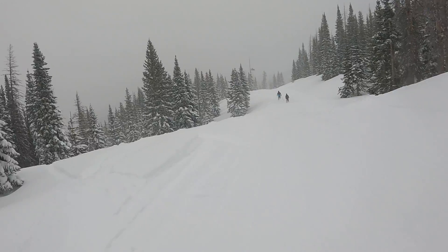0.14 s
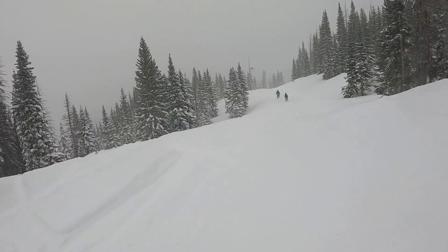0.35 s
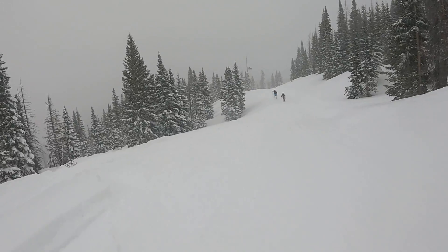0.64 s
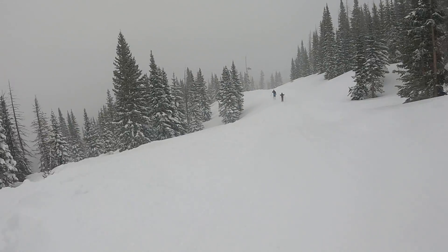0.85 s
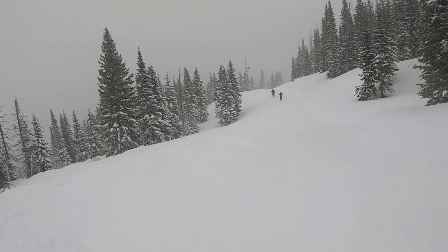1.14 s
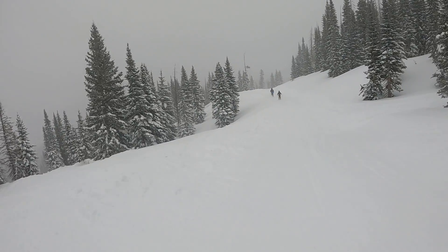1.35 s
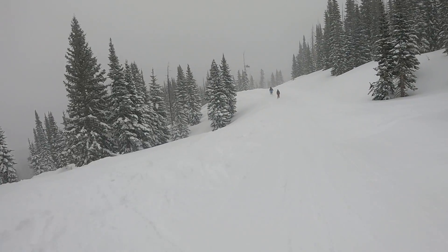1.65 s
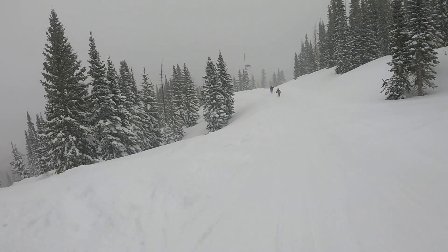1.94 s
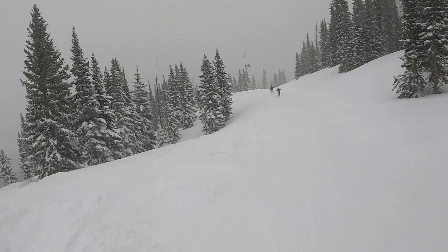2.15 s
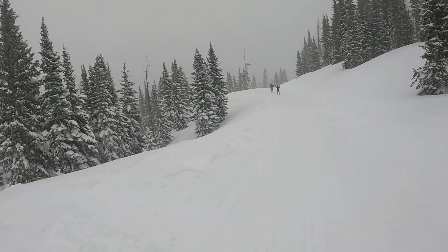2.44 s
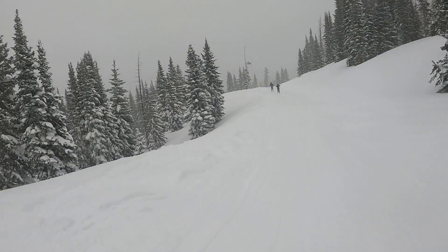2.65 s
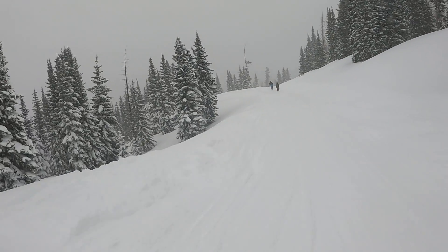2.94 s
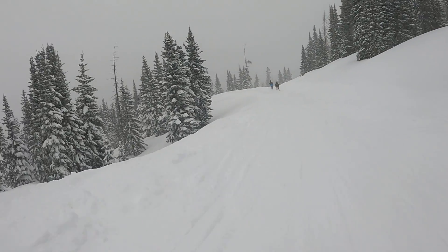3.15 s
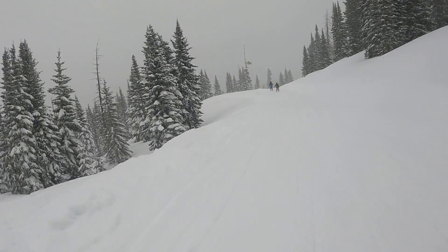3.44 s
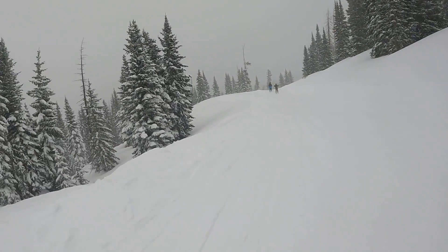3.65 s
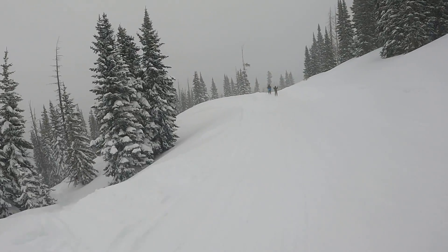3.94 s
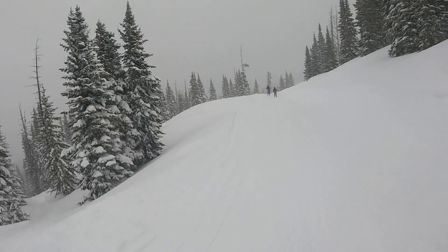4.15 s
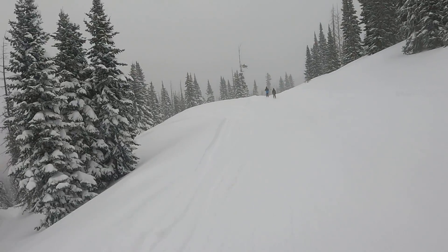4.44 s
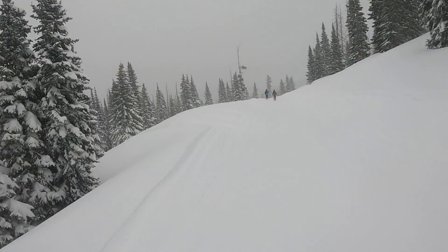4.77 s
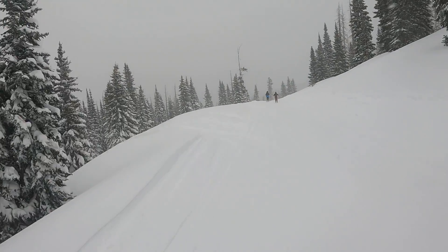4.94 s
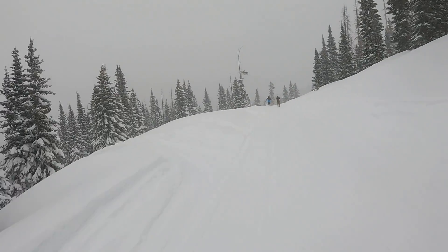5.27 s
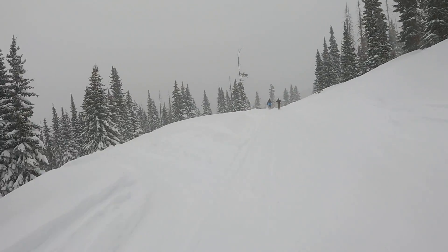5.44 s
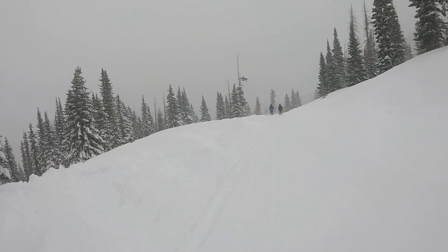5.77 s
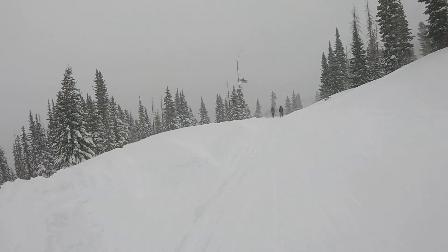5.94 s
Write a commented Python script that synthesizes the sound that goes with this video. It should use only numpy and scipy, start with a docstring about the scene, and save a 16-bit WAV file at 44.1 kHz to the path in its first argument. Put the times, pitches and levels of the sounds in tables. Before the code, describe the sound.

Skiing through falling snow: crisp, irregular little ticks close on the microphone, with thin ski hiss and deep wind buffeting.

```python
"""Skiing in falling snow

A small camera rides with a skier down a slope. Ice grains tick against its plastic housing, which rings
for a millisecond or two; the skis hiss through the same housing; wind rumbles on the microphones and
shakes the mount. The camera thins out everything between the rumble and about 800 Hz."""
import sys
import numpy as np
from scipy import signal
from scipy.fft import rfft, irfft, next_fast_len
from scipy.io import wavfile
from scipy.ndimage import uniform_filter1d

SR = 44100
rng = np.random.default_rng(int(sys.argv[2]) if len(sys.argv) > 2 else 0)


def master_out(mix):
    """Clip the mix to full scale and print it as 16-bit PCM to the path in sys.argv[1]."""
    frames = np.transpose(np.atleast_2d(mix))
    ceiling = np.clip(frames, -1, 1)
    pcm = np.round(ceiling * 32767).astype(np.int16)
    wavfile.write(sys.argv[1], SR, pcm)


N = 269451
TIME_S = np.arange(N) / SR
TAIL_S = np.arange(600) / SR

# Housing modes: pitch_hz, ring_ms, struck_db, hiss_db, left_over_right_db, left_lead_rad
HOUSING_MODES = [(818, 2.05, -19, -20, -12, 1.), (1006, 0.87, -4.5, -15, -3, 0.12),
                 (1330, 0.72, 8.5, -11.5, 2, 0.17), (1726, 0.42, 11.5, -9, 2.5, 0.35),
                 (2250, 0.54, -9, -12, 3, -0.99), (2881, 0.51, 0.5, -10.5, 4.5, -0.86),
                 (3366, 0.37, -2.5, -16.5, 1.5, -1.44), (4260, 0.33, 1, -9.5, -6.5, 0.06),
                 (4656, 0.27, 3, -11, -2, 0.24), (5405, 0.25, 5, -10.5, -2.5, 0.044),
                 (6170, 0.22, -1, -19, 0.5, 0.05), (7100, 0.16, -0.5, -21, 1, -0.093),
                 (8190, 0.15, -14, -24, 3, 0.31), (9430, 0.15, -13.5, -35.5, 1, 0.63),
                 (11600, 0.1, -26, -33, 2.5, 0.91), (13800, 0.19, -39, -58, -2, -1.4),
                 (15600, 0.25, -50, -61, -6, .8)]
KNOCK_MODES, RING_MODES, FIZZ_MODES = HOUSING_MODES[:6], HOUSING_MODES[6:11], HOUSING_MODES[11:]
# Skis on snow: time_s, crackle_db, swish_db, bite_re_swish_db
GLIDE = [(0.0, -49, -51, -1), (0.53, -46.5, -48.5, 5.5), (0.95, -49, -49.5, 2.5), (1.3, -54.5, -55, 3.5),
         (1.48, -51, -58, -0.5), (1.8, -48, -52, -2), (2.04, -48, -54.5, 1.5), (2.28, -45.5, -49.5, 7.5),
         (2.48, -45.5, -50, 9.5), (2.7, -46, -52.5, 8.5), (3.44, -46, -47, 0.5), (3.6, -43.5, -47, 4.5),
         (3.95, -47, -43, -5.5), (4.27, -42.5, -47.5, 6.5), (4.47, -47.5, -50, 3), (5.25, -47, -49.5, -3),
         (5.73, -44, -48, -2), (6.11, -45, -47, -4)]
# Wind strength: time_s, buffet_db, rush_db
WIND_LEVELS = [(0.0, -40, -77), (0.12, -41, -72), (0.41, -47, -69), (0.66, -41, -68), (1.53, -43.5, -76),
               (1.94, -40, -66.5), (2.11, -31.5, -75), (2.21, -42.5, -66.5), (2.31, -34, -70),
               (2.45, -39, -65), (3.11, -34.5, -70), (3.84, -40.5, -61.5), (4.53, -31, -69.5),
               (4.83, -42, -66), (5.31, -38, -70), (5.34, -45, -71.5), (5.87, -40, -64.5),
               (6.11, -46.5, -71.5)]
# Wind spectrum on the microphones: frequency_hz, density_db
WIND_SPECTRUM = [(3.5, -16), (6.0, 5.5), (21, 1), (64, -13.5), (101, -20), (114, -18.5), (162, -24),
                 (383, -35.5), (665, -33.5), (800, -34.5), (1040, -65), (1760, -120)]
# Stronger fits of mount shake: start_s, length_s, level_db
SHAKE_FITS = [(0.752, 0.17, -53.5), (1.329, 0.051, -46.5), (2.4, .06, -50), (2.54, 0.037, -47),
              (2.75, 0.054, -44), (3.055, .072, -54), (3.235, 0.07, -46), (3.37, .12, -41.5),
              (3.615, 0.093, -37), (3.962, 0.21, -40.5), (4.335, 0.1, -50), (4.974, 0.073, -44.5),
              (5.612, 0.056, -48.5), (5.717, 0.045, -45), (5.816, 0.057, -50)]
# Distinct ice grains: start_s, ring_peak_db, ring_hz, knock_re_ring_db, knock_hz, fizz_re_ring_db
ICE_TICKS = [(0.0206, -20.5, 4950, -20, 2910, -15), (0.1678, -16, 4730, -35, 1390, -27),
             (0.1847, -24, 4510, -22, 3090, -2), (0.2143, -19, 4450, -27, 1730, -18),
             (0.2279, -8, 5470, -10.5, 3220, -12), (0.4112, -22, 4300, -17, 2870, -5),
             (0.5664, -16.5, 4800, -18, 1550, -19), (0.705, -34, 5150, -0.5, 840, -22),
             (0.8039, -7.5, 4760, -22.5, 1570, -20), (0.8832, -25.5, 4660, -4.5, 1220, -14),
             (0.8961, -16, 4750, -21, 1650, -13), (0.9219, -35.5, 4890, 5, 1270, -21),
             (0.9748, -9, 5280, -13.5, 3200, -17), (0.9873, -22, 4560, -29, 1480, -16),
             (1.0024, -10.5, 5200, -12.5, 3260, -16), (1.0906, -18.5, 4330, -14, 2980, -10),
             (1.154, -30.5, 4330, -5, 977, -28), (1.228, -40.5, 5150, 9.5, 2860, -1),
             (1.237, -20.5, 4840, -7, 2800, -14), (1.2996, -20, 4630, -17, 3010, -5),
             (1.3138, -18, 4670, -18, 2970, -13), (1.3231, -21.5, 5120, -6, 2800, -27),
             (1.377, -20.5, 4900, -15, 3000, -9), (1.572, -24, 5470, -17, 1610, -5.5),
             (1.6218, -24, 4060, -8, 1330, -9), (1.6512, -18.5, 4500, -15, 3040, -6),
             (1.6997, -19, 4270, -10, 2960, -10), (1.7111, -20, 4230, -7.5, 1310, -8),
             (1.7413, -20.5, 4720, -9, 2860, -7), (1.764, -26, 4570, -8.5, 1610, 0.5),
             (1.8175, -21, 4300, -20, 2800, -8), (1.9068, -10, 4640, -24.5, 1430, -20),
             (1.9473, -15, 4600, -22, 2960, -12), (1.9945, -19, 4670, -23, 1530, -28),
             (2.032, -21, 4700, -32, 2940, -16), (2.0686, -19, 3900, -0.5, 1900, -8),
             (2.1931, -28, 5100, 3.5, 3140, -19), (2.2293, -23.5, 4000, 2, 1220, -5),
             (2.3138, -20, 5150, -23, 2970, -16), (2.4149, -14.5, 5300, -10, 2950, -12),
             (2.4454, -22.5, 5200, -13, 2890, -11), (2.5249, -10, 3680, -4.5, 1480, -16.5),
             (2.552, -22, 4230, -25, 2980, -6), (2.5916, -15, 4280, -15, 1710, -7),
             (2.6285, -17.5, 4670, 1.5, 3140, -2.5), (2.6877, -13.5, 4600, -16.5, 1480, -15),
             (2.745, -21, 5150, -28, 2900, -20), (2.8199, -24, 4170, -10, 2990, -2),
             (2.835, -23.5, 4110, -6, 1600, -6), (2.9026, -15, 4200, -6.5, 2900, -11),
             (2.914, -12, 5070, -22, 1510, -17), (2.9307, -18.5, 4200, -5.5, 857, -18),
             (2.9349, -30.5, 5150, -4, 810, -11), (2.9876, -18, 4700, -24, 1910, -21),
             (3.0822, -25.5, 4020, 2, 2850, -8), (3.111, -20, 4980, 0, 2580, -3),
             (3.1144, -15, 4360, -7.5, 2800, -17), (3.1679, -22, 4650, -29, 1400, -17),
             (3.172, -12, 4830, -28, 1540, -20), (3.19, -22, 5240, -19, 2420, -9),
             (3.203, -22.5, 4260, -24, 1650, -19), (3.2396, -22, 4190, -6, 1740, -19),
             (3.2453, -11.5, 4740, -14, 2050, -15), (3.2549, -18, 5860, -10, 2860, -23),
             (3.3066, -11, 4650, -16, 3100, -6.5), (3.3613, -5.5, 4430, -24.5, 2920, -17),
             (3.446, -21.5, 4150, -2, 1270, -10), (3.5545, -18, 4910, -2.5, 2800, -9),
             (3.5706, -9.5, 5190, -17, 1740, -19), (3.6321, -19.5, 4300, -0.5, 1760, -34),
             (3.6481, -17, 5200, -14.5, 2910, -11), (3.695, -13, 5330, -18, 1630, -9),
             (3.7222, -18.5, 4200, -10.5, 3000, -7), (3.746, -21, 5400, -6, 2800, -27),
             (4.0186, -31, 4070, 1.5, 1400, -20), (4.0521, -20, 4120, -4, 1840, -27),
             (4.0963, -13, 4630, -11.5, 3000, -15), (4.1547, -21, 5200, -24, 3010, -17),
             (4.1864, -25, 4230, 4, 873, -25), (4.2005, -29, 4160, -1, 1370, -6),
             (4.2069, -10.5, 4300, -8.5, 1710, -17), (4.2198, -18, 4800, -3, 1740, -15),
             (4.2251, -10, 4670, -17, 2780, -19), (4.332, -38, 3960, 2, 975, -19),
             (4.3727, -13.5, 4730, -26, 2910, -21), (4.4242, -15, 4700, -20, 3090, -14),
             (4.4421, -11, 4650, -25.5, 1600, -21), (4.4966, -14.5, 4800, -13, 2930, -9.5),
             (4.5688, -26, 4740, -4.5, 1680, -13), (4.599, -9.5, 5170, -12, 1280, -7),
             (4.6337, -28.5, 5740, 0, 940, -21), (4.7656, -15, 5300, -17, 1640, -13),
             (4.7923, -7.5, 4130, -10, 1410, -12.5), (4.8, -18, 4570, -21, 1580, -17),
             (4.805, -21, 4750, -21, 1940, -24), (4.8626, -18.5, 4640, -10, 1520, -10.5),
             (4.9051, -11.5, 4650, -18, 1550, -16), (4.914, -21.5, 4170, -9, 1500, -6),
             (4.9268, -19, 4270, -13.5, 1270, -7), (4.9482, -21.5, 4290, -4, 1360, -8),
             (4.985, -20, 4760, -17, 2970, -19), (5.0458, -18, 4620, -30, 3060, -10),
             (5.0669, -13, 4800, -13.5, 1350, -8), (5.095, -6.5, 5230, -18, 3020, -10.5),
             (5.1536, -17, 5130, -20, 1510, -12.5), (5.1612, -13.5, 5100, -20, 1710, -14),
             (5.2151, -13.5, 4470, -15, 3070, -15), (5.3463, -22.5, 4160, -3, 1360, -7),
             (5.3655, -20, 5530, -14, 2970, -11), (5.4575, -17.5, 4800, -13, 2860, -12),
             (5.519, -10, 5400, -18.5, 3040, -10), (5.568, -17, 4040, -9.5, 1730, -15),
             (5.5868, -14.5, 5170, -17.5, 1830, -13), (5.6327, -15.5, 4540, -27, 1820, -19),
             (5.6619, -28.5, 4750, -0.5, 1720, -15), (5.6724, -9, 4350, -19.5, 1380, -16),
             (5.6818, -16, 4600, -22, 3040, -6), (5.7184, -16, 5140, -15, 1570, -14),
             (5.7453, -15, 4600, -9.5, 2860, -21), (5.755, -13, 4400, -13.5, 1510, -9),
             (5.824, -24, 5170, -8.5, 1660, -11), (5.8587, -12, 5300, -15, 3120, -18),
             (5.894, -19.5, 5400, -20, 1670, -6), (5.9214, -20.5, 4400, -7, 1730, -16),
             (5.973, -23, 4570, -4.5, 1670, -6), (6.0668, -21.5, 4340, -9, 1300, -15),
             (6.0749, -20, 4300, 2, 1560, -13)]
# Blunt thumps on the microphones: start_s, peak_db
THUMPS = [(4.788, -46), (5.01, -32), (5.221, -42)]


def undb(db):
    """Decibels to gain."""
    return 10 ** (np.asarray(db) / 20)


def unit(x):
    """Scale to rms 1."""
    return x / np.sqrt(np.mean(x ** 2))


def curves(table):
    """Columns after time_s, interpolated per sample."""
    time_s, *columns = np.transpose(table)
    return [np.interp(TIME_S, time_s, column) for column in columns]


def wander(rate_hz):
    """Ramps between random levels, rms 1."""
    step = int(SR / rate_hz)
    held = np.repeat(rng.standard_normal(N // step + 1), step)
    return unit(uniform_filter1d(held, step)[:N])


def steady(noise, span_s):
    """Noise with its slow swells evened out, rms 1."""
    local_power = uniform_filter1d(noise ** 2, int(span_s * SR))
    return unit(noise / np.sqrt(local_power + 0.056 * np.mean(noise ** 2)))


def housing_rings(modes):
    """Modes swell and die in a few ring times, high ones starting softer. Complex (port, mode, sample)."""
    hz, ring_ms, _, _, pan_db, lead_rad = np.transpose(modes)[:, :, None]
    age = TAIL_S / (ring_ms / 1000)
    ring = np.where(hz < 2000, age, age ** 2) * np.exp(-age + 2j * np.pi * hz * TAIL_S)
    pan = undb(pan_db / 2) * np.exp(.5j * lead_rad)
    return np.array([ring * pan, ring / pan])


def ski_hiss(crackle_db, swish_db, bite_db, bite_hz=2230, bite_width_oct=0.53):
    """Snow under the skis drives the housing with noise: smooth swish below, fluttering crackle on top."""
    flutter_db = 0.61 * wander(5.3) + 3.4 * wander(90)
    layers = ((KNOCK_MODES, swish_db + .4 * flutter_db, bite_db, .5),
              (RING_MODES, crackle_db + flutter_db, 0, .15),
              (FIZZ_MODES, crackle_db + 1.2 * flutter_db, 0, .6))
    out = 0
    for modes, level_db, boost_db, width in layers:
        responses = np.swapaxes(housing_rings(modes).imag, 0, 1)
        for (hz, _, _, hiss_db, *_), response in zip(modes, responses):
            mid, side = rng.standard_normal((2, N))
            near_bite = np.exp(-(np.log2(hz / bite_hz) / bite_width_oct) ** 2)
            mode_db = hiss_db + level_db + boost_db * near_bite + 2.12 * wander(25)
            gain = undb(mode_db) / np.sqrt(np.sum(response ** 2) / 2)
            drive = np.array([mid + width * side, mid - width * side]) * gain
            out = out + signal.oaconvolve(drive, response, axes=1)[:, :N]
    return out


def wind_rumble(buffet_db, rush_db, split_hz=130):
    """Turbulence on the microphones: deep buffeting, a rush above; alike at both ports only in the bass."""
    size = next_fast_len(N)
    hz = np.arange(size // 2 + 1) * SR / size + 1e-3
    spectrum_hz, density_db = np.transpose(WIND_SPECTRUM)
    colour = undb(np.interp(np.log(hz), np.log(spectrum_hz), density_db))
    mid, side = rfft(rng.standard_normal((2, size)))
    side *= np.clip(0.027 + (hz / 320) ** 2, 0, .6)
    gust = np.array([mid + side, mid - side]) * colour
    lowpass = 1 / (1 + (hz / split_hz) ** 4)
    buffet = steady(irfft(gust * lowpass, size)[:, :N], span_s=0.183)
    rush = unit(irfft(gust * (1 - lowpass), size)[:, :N])
    return buffet * undb(buffet_db) + rush * undb(rush_db + np.array([[-.8], [.8]]))


def mount_shake(level_db, pitch_hz=99, width_hz=25.8, fade_s=0.042):
    """Wind shakes the mount near one pitch, flaring up in short fits."""
    size = next_fast_len(N)
    hz = np.arange(size // 2 + 1) * SR / size
    push = rfft(rng.standard_normal(size))
    shake = irfft(push / (1 + ((hz - pitch_hz) / (width_hz / 2)) ** 2), size)[:N]
    power = undb(level_db) ** 2
    for start_s, length_s, fit_db in SHAKE_FITS:
        inside_s = np.minimum(TIME_S - start_s, start_s + length_s - TIME_S)
        power += (undb(fit_db) * np.clip(inside_s / fade_s + .5, 0, 1)) ** 2
    return steady(shake, span_s=0.065) * np.sqrt(power)


def strike(modes, peak_db, favour_db, spot_db, port_spread):
    """Each grain hits its own spot: new mode strengths and phases, slightly unlike at the two ports."""
    chance = rng.standard_normal((len(peak_db), 4, len(modes)))
    strength, phase, skew_real, skew_imag = np.swapaxes(chance, 0, 1)
    struck_db = np.transpose(modes)[2]
    share = undb(struck_db + favour_db + spot_db * strength) * np.exp(2j * phase)
    skew = port_spread * (skew_real + 1j * skew_imag)
    left, right = housing_rings(modes)
    hit = np.array([(share * (1 + skew)) @ left, (share * (1 - skew)) @ right]).imag
    mid_peak = np.abs(hit.mean(axis=0)).max(axis=1)
    return hit * (undb(peak_db) / mid_peak)[:, None]


def ice_ticks(start_s, peak_db, ring_hz, knock_db, knock_hz, fizz_db):
    """Grains hit the housing with a ring, a dull knock and a fizz, then rebound more weakly."""
    ring_favour_db = -6.5 * ((np.transpose(RING_MODES)[0] - ring_hz[:, None]) / 1000) ** 2
    # A mode at the knock's pitch leads, however weak otherwise; lower ones are hardly stirred.
    mode_hz, _, struck_db, *_ = np.transpose(KNOCK_MODES)
    off_oct = np.abs(np.log2(mode_hz / knock_hz[:, None]))
    slope_db_per_oct = np.where(mode_hz < knock_hz[:, None], 10, 5)
    knock_favour_db = (13 - struck_db) * np.exp(-(off_oct / 0.1) ** 2) - slope_db_per_oct * off_oct
    # Bigger grains touch longer and stir the highest modes less.
    fizz_oct = np.log2(np.transpose(FIZZ_MODES)[0] / FIZZ_MODES[0][0])
    fizz_favour_db = -.4 * (peak_db + fizz_db + 33.5)[:, None] * fizz_oct
    out = np.zeros((2, N + SR))
    flight, loss = rng.random((len(start_s), 2)).T
    for delay_s, drop_db in ((0, 0), (0.00079 + 0.0015 * flight, -12 - 11 * loss)):
        hit_db = peak_db + drop_db
        hit = strike(RING_MODES, hit_db, ring_favour_db, spot_db=3.0, port_spread=0.073)
        hit += strike(KNOCK_MODES, hit_db + knock_db, knock_favour_db, spot_db=7.0, port_spread=0.2)
        hit += strike(FIZZ_MODES, hit_db + fizz_db, fizz_favour_db, spot_db=3.5, port_spread=0.13)
        onsets = ((start_s + delay_s) * SR).astype(int)
        samples = (onsets[:, None] + np.arange(len(TAIL_S))).ravel()
        out += [np.bincount(samples, port.ravel(), N + SR) for port in hit]
    return out[:, :N]


def sleet(floor_db, count=750, flurry_s=.018):
    """Small grains in loose flurries: mostly faint, a few larger."""
    flurry, lag, size, pitch, knock, knock_pitch, fizz = rng.random((count, 7)).T
    flurry_starts_s = rng.random(count) * N / SR
    lag_s = -flurry_s * np.log(1 - lag)
    start_s = (flurry_starts_s[(flurry * count).astype(int)] + lag_s) % (N / SR)
    peak_db = floor_db[(start_s * SR).astype(int)] + np.minimum(-4.5 * np.log(1 - size), 12)
    return ice_ticks(start_s, peak_db, ring_hz=3900 + 1800 * pitch, knock_db=-21 + 14 * knock,
                     knock_hz=1000 * 3. ** knock_pitch, fizz_db=-19 + 14 * fizz)


def wind_thumps(rise_s=0.0011):
    """Blunt one-sided pulses on the microphones."""
    out = np.zeros(N)
    for start_s, peak_db in THUMPS:
        age = np.maximum(TIME_S - start_s, 0) / rise_s
        out += undb(peak_db) * age * np.exp(1 - age)
    return out


def scene(low_cut_hz=761):
    """Housing sounds lose their lows in the camera's wind filter; the rumble stays."""
    crackle_db, swish_db, bite_db = curves(GLIDE)
    buffet_db, rush_db = curves(WIND_LEVELS)
    housing = ice_ticks(*np.transpose(ICE_TICKS))
    housing += sleet(floor_db=crackle_db + 11)  # both grow as more snow flies
    housing += ski_hiss(crackle_db, swish_db, bite_db)
    wind = wind_rumble(buffet_db, rush_db) + mount_shake(level_db=rush_db + 12) + wind_thumps()
    wind_filter = signal.butter(8, low_cut_hz, "high", fs=SR, output="sos")
    return signal.sosfilt(wind_filter, housing) + wind * undb([[-.25], [.25]])


def record(dry, top_hz=16300):
    """The camera cuts the top."""
    return signal.sosfilt(signal.ellip(10, .2, 70, top_hz, fs=SR, output="sos"), dry)


dry = scene()
out = record(dry)
master_out(out)
```